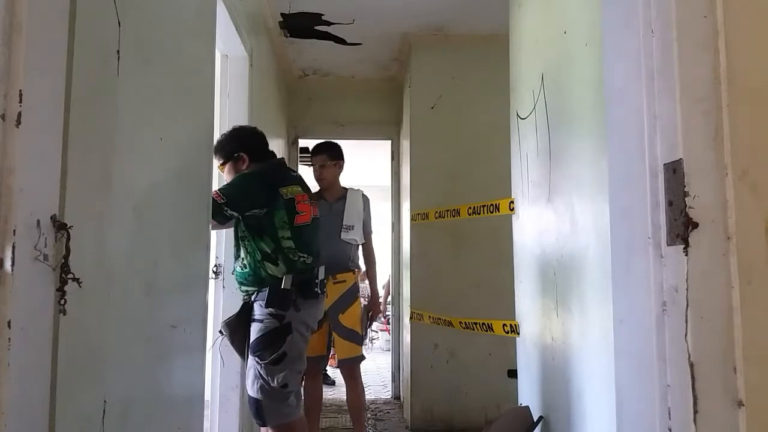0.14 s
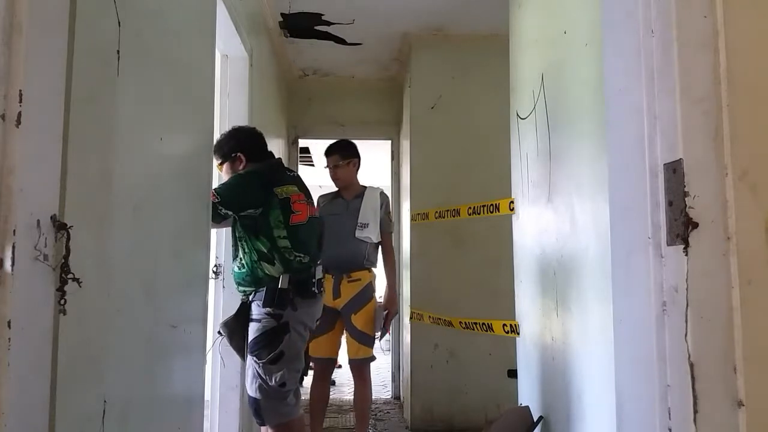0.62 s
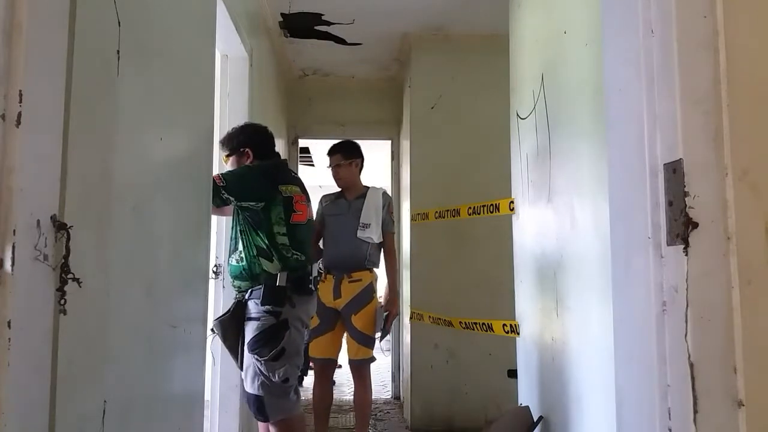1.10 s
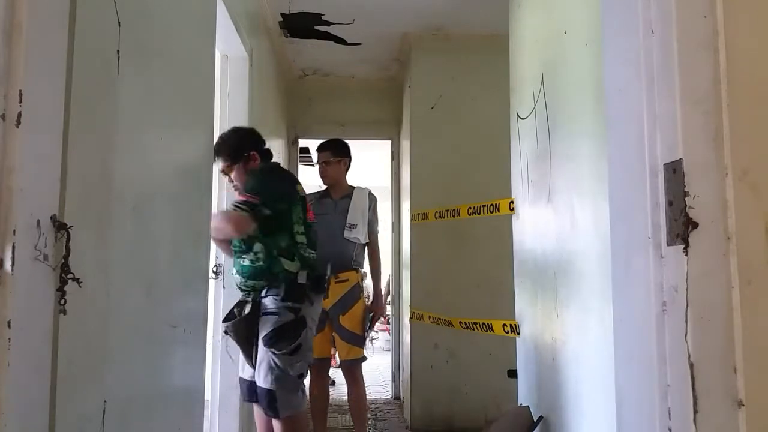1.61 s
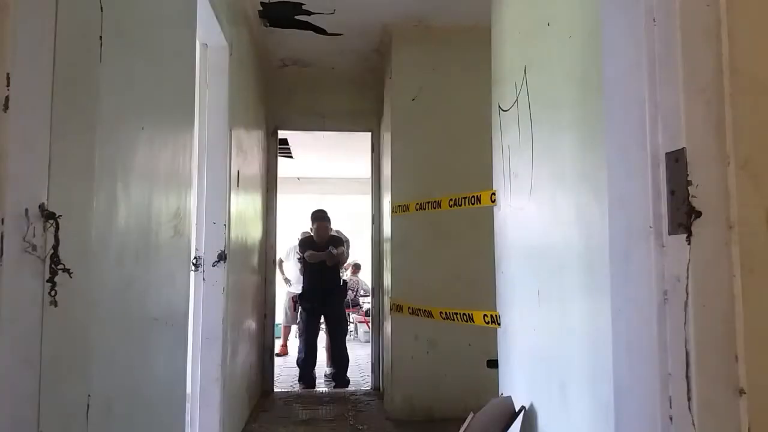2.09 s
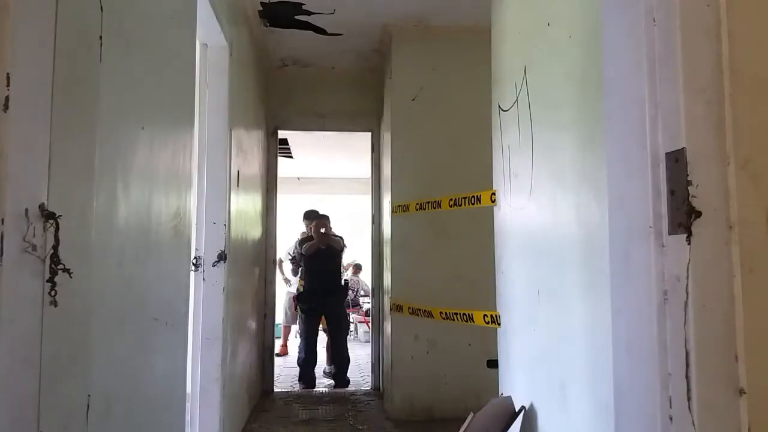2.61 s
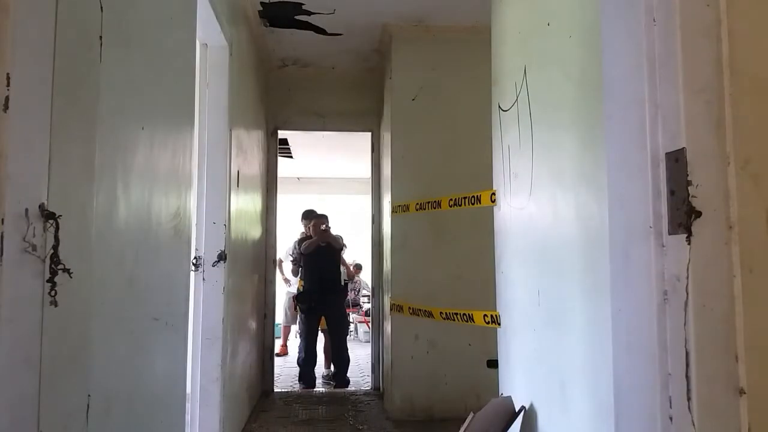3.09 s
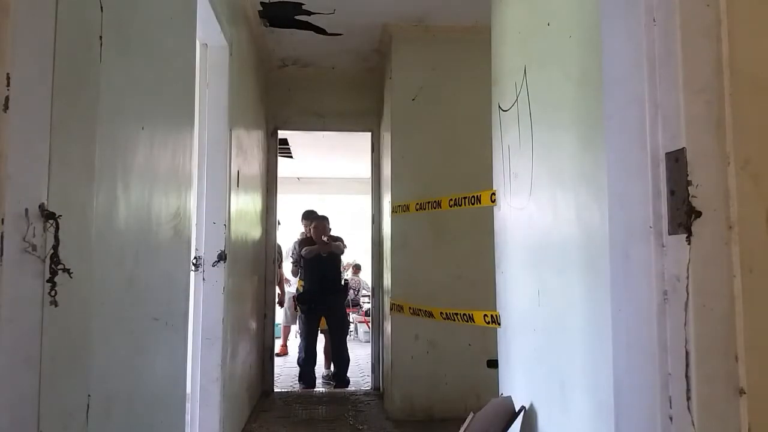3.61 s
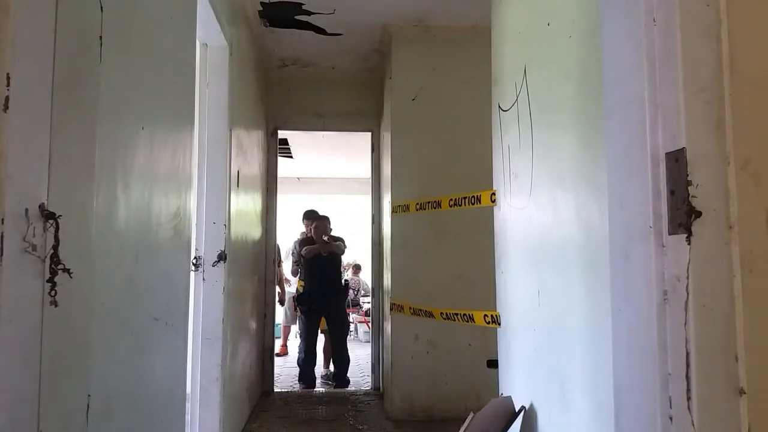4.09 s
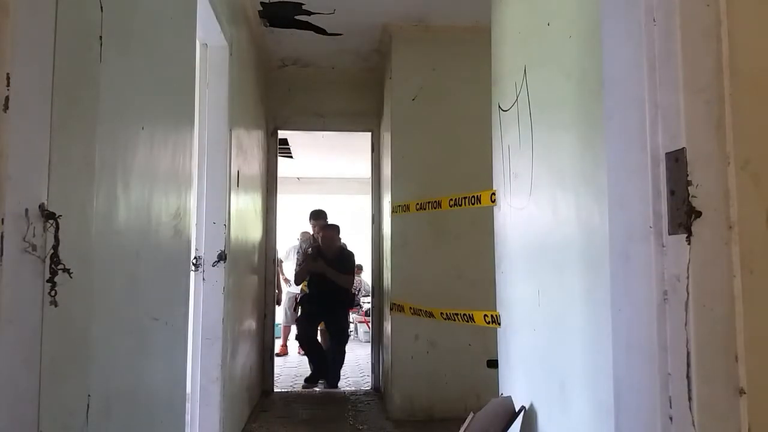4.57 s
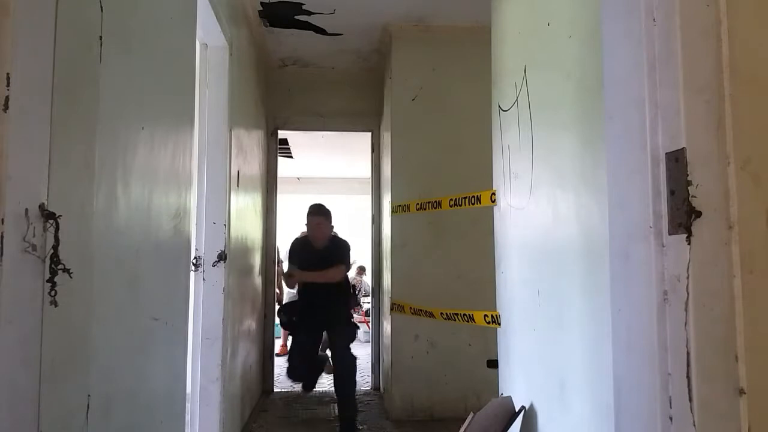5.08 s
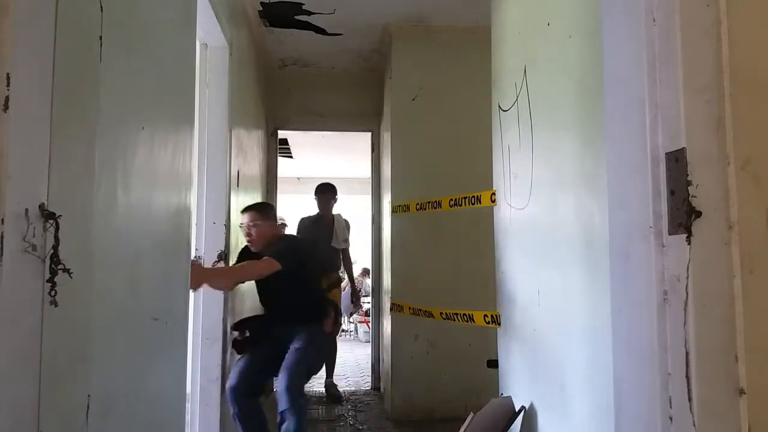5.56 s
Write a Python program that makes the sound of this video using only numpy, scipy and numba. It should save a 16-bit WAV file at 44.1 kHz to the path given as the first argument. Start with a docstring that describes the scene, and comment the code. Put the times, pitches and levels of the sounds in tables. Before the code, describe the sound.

A toy gas pistol cracks in fast pairs along a bare echoing corridor, first around a corner, then sharper from the far doorway.

```python
"""A gas pistol cracks, mostly in quick pairs, in a bare concrete corridor: round a corner, then from the far
doorway. Each shot is a ringing, hissing pulse with bounces, banded noise as reverberation and beating standing
waves. Gear clacks and high pellet ticks (noise, ticks, metal modes) and boots (noise thuds, scuffs, deep bumps)
sound among the shots. Outdoor rumble lies beneath. The corner part fades and is cut to a short silence; the
doorway part fades in. A small camera squeezes the loudest moments."""
import sys
import numpy as np
from scipy import signal
from scipy.fft import rfft, irfft, next_fast_len
from scipy.io import wavfile
from numba import njit

SR = 44100
rng = np.random.default_rng(int(sys.argv[2]) if len(sys.argv) > 2 else 0)


def dump(signal):
    """Clip the signal to [-1, 1] and save it as 16-bit WAV at the path in sys.argv[1]."""
    limited = np.clip(np.atleast_2d(signal).T, -1, 1)
    pcm = np.round(limited * 32767).astype(np.int16)
    wavfile.write(sys.argv[1], SR, pcm)


def ratio(d):
    """dB to gain"""
    e = np.asarray(d, float) / 20
    return 10 ** e


N = 251370
T = np.arange(N) / SR

# pistol shots, levels relative: start_s, level_db, boom_db, crack_db (over level), ring_hz (nominal)
SHOTS = [(.045, -3.5, -1.5, 5, 1250), (0.225, -1.5, -3, 0.5, 1276), (0.501, -0.5, -1.5, -3.5, 1280),
         (0.696, -2.5, -2.5, -5.5, 1290), (1.196, -5, -3, -8, 1300), (1.433, -8, -5, -11, 1320),
         (2.2909, -3.5, -0.5, -9.5, 4900), (2.5061, -4.5, -1.5, 5.5, 6100), (3.178, -7.5, -6, -2, 3100),
         (3.4842, -6.5, -5.5, 2.5, 3300), (4.0303, -7, -3.5, 4.5, 3220), (4.275, -6.5, -3.5, 5.5, 3140),
         (5.6477, -4, 3.5, -14, 4940)]
# shot spectrum heard round the corner: freq_hz, density_db (per Hz, relative)
CORNER_SPECTRUM = [(35, -65), (60, -19), (168, -7.5), (212, 6.5), (250, -0.5), (363, -1.5), (698, -7.5),
                   (903, -1), (1780, -7), (4220, -6.5), (5700, -13), (8000, -14), (16000, -22)]
# shot spectrum heard from the doorway: freq_hz, density_db (per Hz, relative)
DOOR_SPECTRUM = [(35, -37), (60, -29), (140, -11.5), (212, -2.5), (262, -14), (346, -7), (715, -14),
                 (968, -8), (3270, -10), (6100, -12), (7200, -19), (10500, -24), (16000, -31.5)]
# corridor decay: freq_hz, t60_s
DECAY = [(60, 2.2), (160, 0.77), (420, 1.11), (1100, 0.85), (2900, 0.77), (7700, 0.63), (15000, 0.6)]
# standing waves of the corridor: freq_hz (nominal), corner_db, door_db (relative), t60_s
STANDING = [(96.56, -7.5, -13.5, 1.28), (141.7, -8.5, -5.5, 1.1), (168, -15.5, -21, 0.85),
            (213.9, 1, 0, 1.125), (292, 0.5, -6.5, 0.84), (341.2, 0, 1.5, 1.09), (407, -17, -7.5, 1.1),
            (544.3, -9, -10, 1.5)]
# gear clacks and high pellet ticks (0.295, 2.857 s): start_s, level_db (relative), pitch_hz, width_octaves,
# tick_db (over level)
CLACKS = [(.295, -10, 7900, 0.75, -4.5), (1.83, -22, 4347, 1.1, 15), (1.836, -24.5, 4540, 1.04, 12),
          (1.852, -27, 1960, 0.77, 13), (2.857, -40.5, 7300, 0.32, 20.5), (5.054, -43.5, 4040, 0.94, -6.5),
          (5.31, -50, 1930, 0.2, -2), (5.453, -44, 1950, 0.3, -8), (5.547, -44.5, 1950, 0.54, 10),
          (5.574, -54, 3450, 1.2, 0)]
# ringing metal parts: freq_hz (nominal), level_db (relative), t60_s
METAL_MODES = [(1950, -5, .25), (2500, -5, .2), (3350, 0, .22), (4700, 2, .3), (6070, -2, .3),
               (7500, -5, .15)]
# footfalls: heel_s, roll_s (heel to sole), thud_db, scuff_db (relative)
STEPS = [(1.981, .061, -43, -62.5), (2.152, 0.049, -46, -60), (4.827, .06, -42.5, -36),
         (5.15, 0.052, -42.5, -42), (5.438, 0.054, -38.5, -42)]
# outdoor rumble spectrum: freq_hz, density_db (per Hz, relative)
RUMBLE_SPECTRUM = [(18, -38), (30, -23.5), (70, -8), (280, -7), (400, -8.5), (600, -25), (900, -12.5),
                   (1320, -28.5), (1960, -15), (2400, -32.5), (5000, -28.5), (7000, -38), (16000, -43.5)]
# microphone response: freq_hz, gain_db
MICROPHONE = [(20, -1), (5400, -1), (6200, -2.5), (6800, -5), (15700, -9.5), (16100, -39.5)]

CUT_S = 1.79
FADE_END_S, FADE_IN_S = 1.916, 0.045
SILENT_S = 1.777, 1.797  # start, end
SLIDE_HZ, SLIDE_DELAY_S = 6100, 0.00098
CLUMP_RMS_DB, CLUMP_S, BLEND_S = 1.8, .0025, .12
CLACK_RING_DB, TICK_BOUNCE_DB = -6, -14
HEEL_HZ, SOLE_HZ, SOLE_DB = 273, 150, -3.5  # sole level over heel
WEIGHT_HZ, WEIGHT_DB, WEIGHT_S = 69, -6.5, 0.025  # pitch, level over thud_db, half length at 1/e
RUMBLE_DB = -13.5, -26.5  # offset before, after the cut
RUMBLE_WAVER_RMS_DB, RUMBLE_WAVER_S = 1.5, .12
CORNER = [row for row in SHOTS if row[0] < CUT_S]
DOOR = [row for row in SHOTS if row[0] > CUT_S]


def cracks():
    """Direct shots: in sight they ring clearly with the slide's clang; round the corner they arrive scattered."""
    door = sum(crack(s, db + crack_db + 2.5, hz, 0.0054, 0.46) for s, db, _, crack_db, hz in DOOR)
    slide = sum(crack(s + SLIDE_DELAY_S, db - 1, SLIDE_HZ, 0.0042, 0.23) for s, db, *_ in DOOR)
    corner = sum(crack(s + .003, db + crack_db + 4.0, hz, 0.0056, 0.99) for s, db, _, crack_db, hz in CORNER)
    return door + slide + corner


def crack(start_s, level_db, hz, ring_s, noisy, step=0.86, bounce_db=0.0):
    """Direct sound: a pressure pulse and a rising ring with gas noise, then separate bounces off floor and walls."""
    t = T[:SR // 50]
    ring = np.sin(2 * np.pi * hz * t * (0.917 + 0.15 * t / ring_s) + 2 * np.pi * rng.random())
    hiss = signal.lfilter(*signal.iirpeak(hz, .9, fs=SR), rng.standard_normal(len(t)))
    blast = ((1 - noisy) * ring + 2 * noisy * hiss) * np.exp(-(t / ring_s) ** 4)
    blast[:6] -= step * np.hanning(6)
    paths = np.zeros(SR // 5)
    paths[[0, int(.0055 * SR)]] = 1, .5
    later_s, size = rng.random((2, 14))
    later_s = 0.011 + 0.16 * later_s
    echoes = np.zeros(SR // 5)
    echoes[(later_s * SR).astype(int)] = (2 * size - 1) * ratio(bounce_db - 60 * later_s)
    # later bounces keep the sharp front, lose the ring
    sound = np.convolve(paths, blast) + np.convolve(echoes, blast * np.exp(-t / .0008))
    out = np.zeros(N + len(sound))
    out[int(start_s * SR):][:len(sound)] = ratio(level_db) * sound
    return out[:N]


def corner_shots(hz):
    """Shot energy in one band: a weak front bends round the corner first, the bulk comes by way of the walls."""
    front = shot_energy(CORNER, CORNER_SPECTRUM, hz, bright_db=0.3, lead_s=0.0075)
    front = front * ratio(12.5) * min(hz / 2000, 1)
    bulk = shot_energy(CORNER, CORNER_SPECTRUM, hz, bright_db=1.0) * ratio(20)
    earlier = train([0], -22 + table(CORNER_SPECTRUM, hz))  # tail of an earlier shot, nearly gone
    return linger(bulk + front, hz, 0.0062) + linger(earlier, hz, 0.00081)


def door_shots(hz):
    """Shot energy in one band at the doorway; this part opens on a shot's tail."""
    shots = shot_energy(DOOR, DOOR_SPECTRUM, hz, bright_db=2.0)
    opening = train([CUT_S], -8 + table(DOOR_SPECTRUM, hz))
    return linger(shots, hz, 0.0093) * ratio(23.5) + linger(opening, hz, 0.0027)


def shot_energy(rows, spectrum, hz, bright_db, lead_s=0.):
    """Muzzle energy in one band: the gun's spectrum, boom below 500 Hz, bright_db per octave above 2 kHz."""
    s, db, boom_db = np.transpose(rows)[:3]
    octave = np.log2(hz / 500)
    tilt_db = boom_db * np.clip(-octave, 0, 1) + bright_db * max(octave - 2, 0)
    return train(s - lead_s, db + table(spectrum, hz) + tilt_db)


def linger(energy, hz, fill_s, liveness=1):
    """Energy fills the corridor with time constant fill_s, then leaks away at its band's t60 times liveness."""
    fill = np.exp(-1 / (fill_s * SR))
    leak = ratio(-120 / (liveness * table(DECAY, hz) * SR))  # 60 dB of energy per t60
    return signal.lfilter([1 - fill], np.convolve([1, -fill], [1, -leak]), energy)


def train(times_s, level_db):
    """Bursts of sound energy (amplitude squared) at the given times."""
    x = np.zeros(N)
    np.add.at(x, (np.asarray(times_s) * SR).astype(int), ratio(level_db) ** 2)
    return x


def reverberation(hz):
    """Diffuse amplitude in one band: energies of shots, small sounds and rumble add."""
    shots = np.where(T < CUT_S, corner_shots(hz), door_shots(hz))
    # small sounds by the open doorway escape sooner
    small = linger(clack_energy(hz) + boot_energy(hz), hz, .002, liveness=0.94)
    return np.sqrt(shots + small + rumble(hz) ** 2)


def bands(course, ripple_db):
    """Noise in third-octave bands, gain in time course(hz); the room favours some narrow lines by ripple_db rms."""
    size = next_fast_len(N)
    hz = np.fft.rfftfreq(size, 1 / SR)
    line_hz = np.arange(0, SR / 2 + 40, 25.)
    line_db = ripple_db * rng.standard_normal(len(line_hz))
    noise = rfft(rng.standard_normal(size)) * ratio(np.interp(hz, line_hz, line_db))
    out = 0
    for centre_hz in 25 * 2 ** (np.arange(29) / 3):
        thirds = 3 * np.log2(np.maximum(hz, 1) / centre_hz)
        window = np.cos(np.pi / 2 * np.clip(thirds, -1, 1)) ** 2
        out = out + irfft(noise * window, size)[:N] * course(centre_hz)
    return out


def clumps():
    """Early echoes arrive in clumps common to all bands: a gain flicker around each shot that soon blends."""
    knots = np.arange(0, N / SR + 1, CLUMP_S)
    flicker = np.interp(T, knots, rng.standard_normal(len(knots)))
    times = np.array([row[0] for row in SHOTS])
    since = T - times[np.maximum(np.searchsorted(times, T) - 1, 0)]
    return ratio(CLUMP_RMS_DB * flicker * np.exp(-np.abs(since) / BLEND_S))


def booms():
    """Shots, heels and soles excite the standing waves."""
    corner, door = np.transpose(CORNER), np.transpose(DOOR)
    s, roll_s, thud_db, _ = np.transpose(STEPS)
    first = standing_waves(corner[0], corner[1] + corner[2] - 14, at_door=False)
    second = standing_waves(door[0], door[1] + door[2] - 18)
    second += standing_waves(s, thud_db - 4.5)
    second += standing_waves(s + roll_s, thud_db + SOLE_DB - 5)
    return np.where(T < CUT_S, first, second)


def standing_waves(times_s, level_db, at_door=True):
    """Each blow rings the waves between the walls afresh; not quite parallel walls make close pairs that beat."""
    out = np.zeros(N)
    chance = rng.uniform(-1.038, 1, (len(times_s), len(STANDING), 5))
    for s, gain, draws in zip(times_s, ratio(level_db), chance):
        t = T[:N - int(s * SR)][:SR]
        for (hz, corner_db, door_db, t60_s), (d1, d2, p1, p2, size) in zip(STANDING, draws):
            wave_db = door_db if at_door else corner_db
            pair = np.sin(2 * np.pi * hz * (1 + 0.0151 * d1) * t + np.pi * p1)
            pair += np.sin(2 * np.pi * hz * (1 + 0.0126 * d2) * t + np.pi * p2)
            envelope = ratio(wave_db + 2 * size - 60 * t / t60_s) * (1 - np.exp(-t / 0.025))
            out[int(s * SR):][:len(t)] += gain * envelope * pair
    return out


def clack_ticks():
    """Dry front of each clack: a short ring with bounces too weak and thin to stand apart."""
    return sum(crack(s, db + tick_db, hz, 0.0014, 0.17, step=.3, bounce_db=TICK_BOUNCE_DB)
               for s, db, hz, _, tick_db in CLACKS)


def clack_energy(hz):
    """Clack energy in one band, humped round each clack's pitch."""
    s, db, pitch_hz, octaves = np.transpose(CLACKS)[:4]
    return train(s, db + 5.5 + hump(hz, pitch_hz, octaves))


def clack_ring():
    """Each clack rings the metal parts near its own pitch, a little differently every time."""
    out, t = np.zeros(N), T[:SR // 2]
    chance = rng.uniform(-1.1, 1, (len(CLACKS), len(METAL_MODES), 2))
    for (s, db, pitch_hz, octaves, _), draws in zip(CLACKS, chance):
        part = out[int(s * SR):][:len(t)]
        for (hz, mode_db, t60_s), (detune, size) in zip(METAL_MODES, draws):
            wobble = 1 + 0.59 * np.sin(2 * np.pi * (60 + 25 * detune) * t)  # close pairs beat
            ring_db = db + CLACK_RING_DB + mode_db + hump(hz, pitch_hz, octaves) + 2 * size
            tone = np.sin(2 * np.pi * hz * (1 + .012 * size) * t)
            part += (ratio(ring_db - 60 * t / t60_s) * wobble * tone)[:len(part)]
    return out


def boot_energy(hz):
    """Footfall energy in one band: heel, then a deeper sole with the body's weight, and a gritty scuff."""
    s, roll_s, thud_db, scuff_db = np.transpose(STEPS)
    heel = train(s, thud_db + 14.0 + hump(hz, HEEL_HZ, 1.4))
    sole = train(s + roll_s, thud_db + 14.5 + SOLE_DB + hump(hz, SOLE_HZ, 1.5))
    scuff = train(s, scuff_db + 3.0 + hump(hz, 1220, 1.27))
    return heel + sole + scuff


def weight():
    """The floor gives under the sole: a short deep bump as it takes the body's weight."""
    out = np.zeros(N)
    for s, roll_s, thud_db, _ in STEPS:
        envelope = np.exp(-((T - s - roll_s) / WEIGHT_S) ** 2)
        out += ratio(thud_db + WEIGHT_DB) * envelope * np.sin(2 * np.pi * WEIGHT_HZ * (T - s))
    return out


def rumble(hz):
    """Outdoor rumble amplitude in one band, wavering at random."""
    knots = np.arange(0, N / SR + 1, RUMBLE_WAVER_S)
    waver_db = np.interp(T, knots, RUMBLE_WAVER_RMS_DB * rng.standard_normal(len(knots)))
    return ratio(np.where(T < CUT_S, *RUMBLE_DB) + table(RUMBLE_SPECTRUM, hz) + waver_db)


def table(rows, hz):
    """Interpolate (freq_hz, value) rows on a log frequency axis."""
    f, v = np.transpose(rows)
    return np.interp(np.log(hz), np.log(f), v)


def hump(hz, centre_hz, octaves):
    """Rounded peak in dB, 6 dB down so many octaves from its centre."""
    return -6 * (np.log2(hz / centre_hz) / octaves) ** 2


def scene():
    """Corner and doorway parts in the same corridor, joined at the cut."""
    diffuse = clumps() * bands(reverberation, ripple_db=1.5)
    return (diffuse + cracks() + booms() + clack_ticks() + clack_ring() + weight())[None]


@njit
def follow(x, attack, release):
    """Level follower, quick up and slower down; attack and release are per-sample fractions."""
    e, out = 1e-6, np.empty(len(x))
    for i in range(len(x)):
        e += (abs(x[i]) - e) * (attack if abs(x[i]) > e else release)
        out[i] = e
    return out


def fade():
    """Edit gain: straight fade cut off at a short silence, then a quick fade in."""
    return np.where(T < SILENT_S[0], 1 - T / FADE_END_S, np.clip((T - SILENT_S[1]) / FADE_IN_S, 0, 1))


def top_cut(x):
    """Nothing passes above the cut-off."""
    return signal.sosfilt(signal.butter(12, 16620, fs=SR, output="sos"), x)


def record(dry):
    """Microphone, duller above its port resonance; look-ahead gain control; soft clipping; the edit's fade."""
    size = next_fast_len(N)
    hz = np.maximum(np.fft.rfftfreq(size, 1 / SR), 1)
    x = irfft(rfft(dry, size) * ratio(table(MICROPHONE, hz)), size)[:, :N]
    ahead = int(0.0085 * SR)
    attack_s, release_s = 0.00097, 0.013
    early = np.append(x[0, ahead:], np.zeros(ahead))
    heard = follow(early, 1 / (attack_s * SR), 1 / (release_s * SR))
    gain = np.minimum(1, ratio(-12.5) / heard) ** 0.52
    mix = 0.92 * np.tanh(gain * x) * fade()
    return top_cut(mix)


dry = scene()
out = record(dry)
dump(out)
```